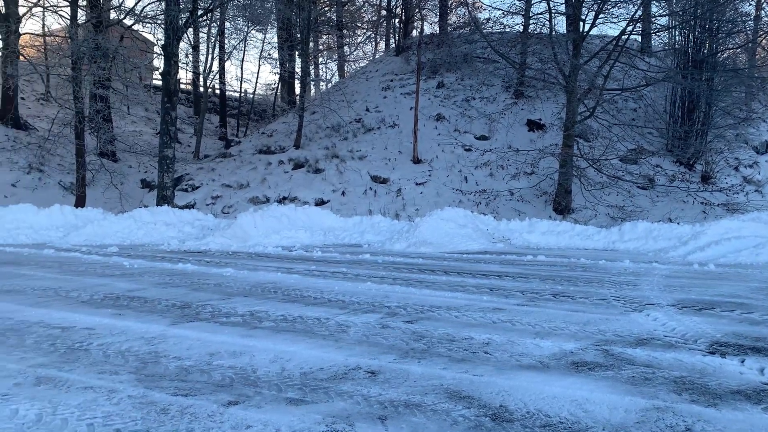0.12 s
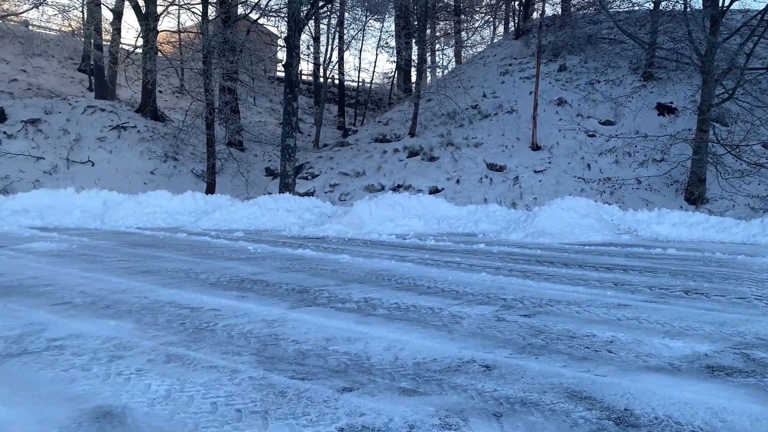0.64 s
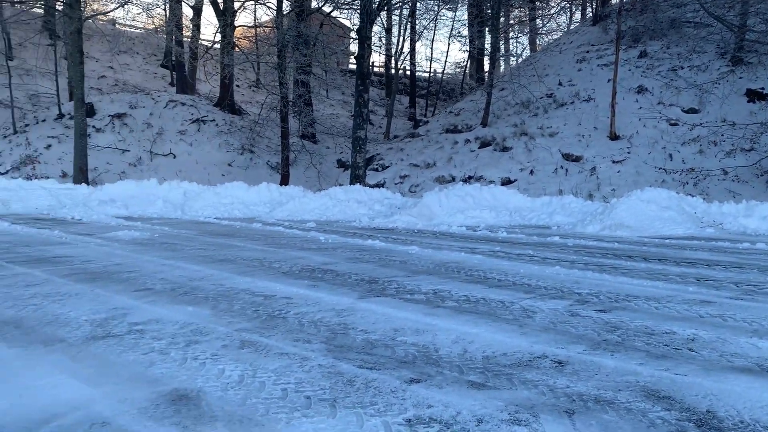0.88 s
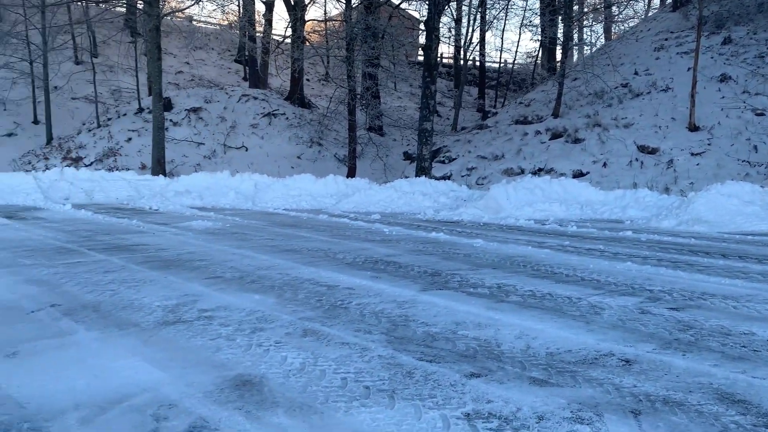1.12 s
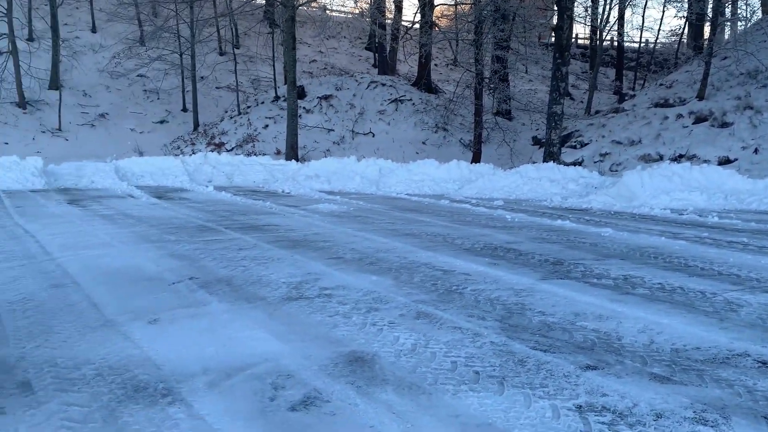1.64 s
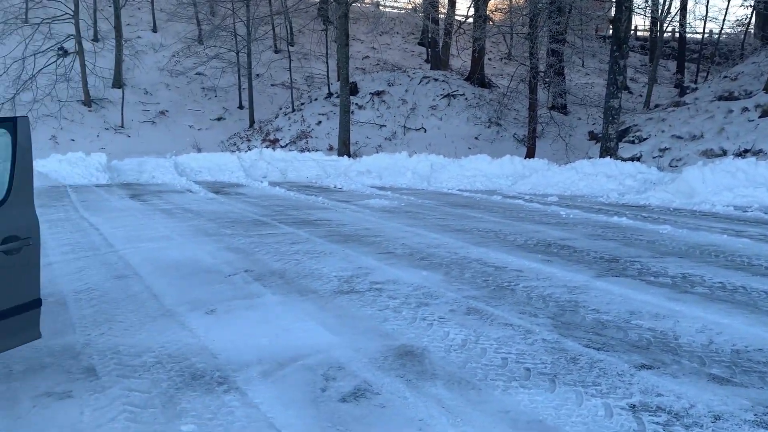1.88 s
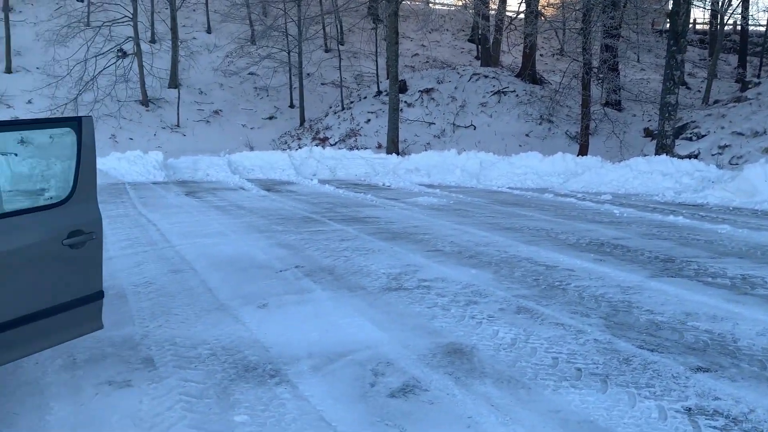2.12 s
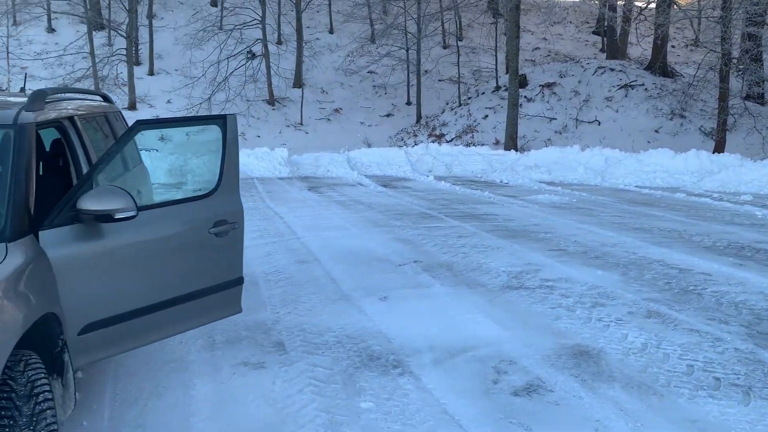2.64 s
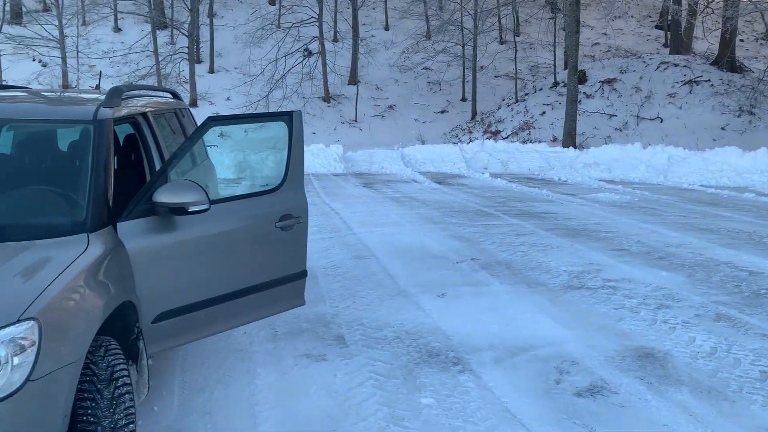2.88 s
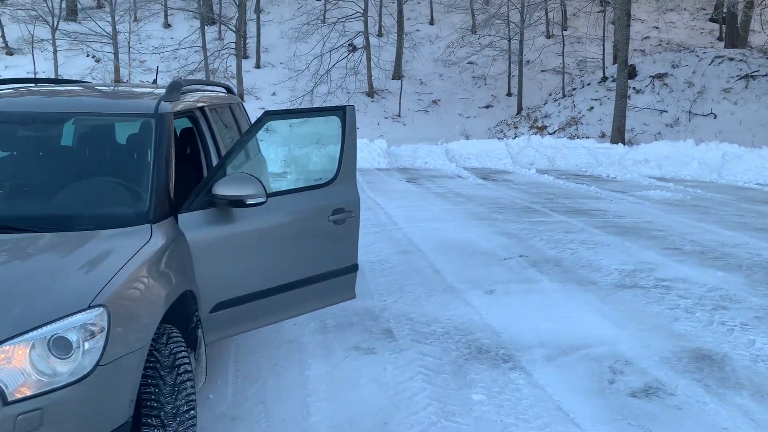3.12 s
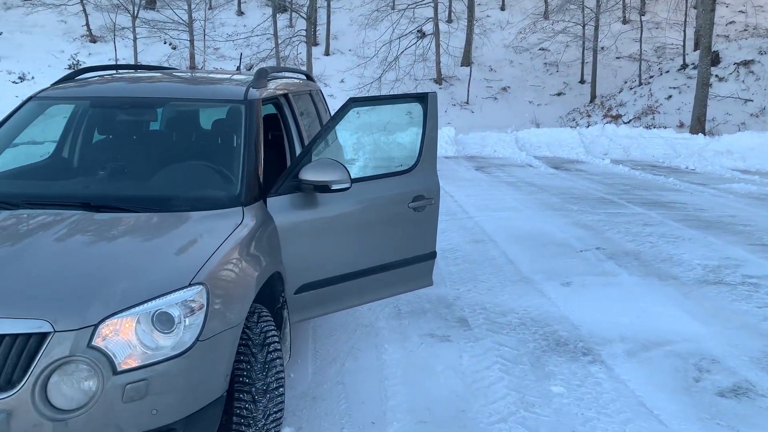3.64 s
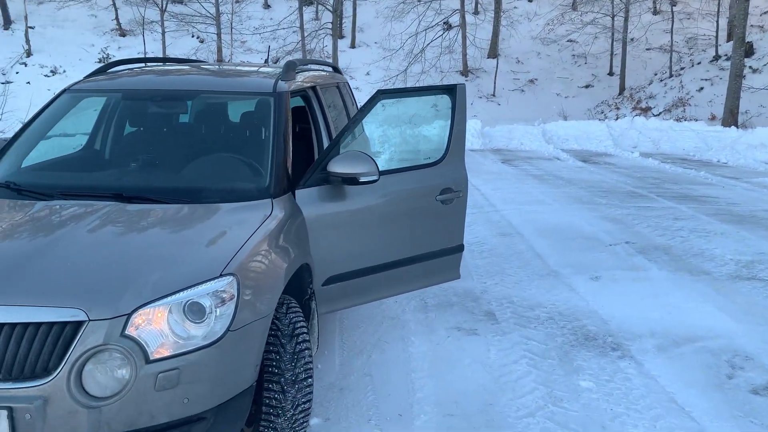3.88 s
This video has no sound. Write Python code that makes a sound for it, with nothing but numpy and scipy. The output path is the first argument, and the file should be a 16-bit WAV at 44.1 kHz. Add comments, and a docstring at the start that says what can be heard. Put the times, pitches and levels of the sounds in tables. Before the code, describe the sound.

Close snow crunching under boots: small crackles, a brief heel crunch, soft sliding, then heavy crusty cracks. Low engine hum and far traffic rumble lie beneath, outdoors, on a mono handheld phone.

```python
"""A cold car park: boots shift and turn on packed snow, close below a handheld phone, in mono.
Crusts crack in short knocks built from brief wave packets and bursts of noise; single crystals tick.
Fine crystals crush and slide under the soles: coloured noise under random grain envelopes.
A car idles nearby, a sum of harmonic orders, over distant traffic of filtered noise."""
import sys
import numpy as np
from scipy import signal
from scipy.fft import rfft, irfft
from scipy.io import wavfile
from scipy.ndimage import uniform_filter1d

SR = 44100
rng = np.random.default_rng(int(sys.argv[2]) if len(sys.argv) > 2 else 0)


def convert_level_to_amplitude(level_db):
    """Map a level in decibels to its linear amplitude factor."""
    exponent = np.asarray(level_db, float) / 20
    return 10 ** exponent


def inscribe(sig):
    """Save sig as 16-bit PCM at rate SR to the path in sys.argv[1].

    A 1-D sig is mono; a 2-D sig holds one channel per row.
    Samples are clipped to [-1, 1] before scaling.
    """
    pcm = np.round(np.clip(np.atleast_2d(sig).T, -1, 1) * 32767)
    wavfile.write(sys.argv[1], SR, pcm.astype(np.int16))


N = 176400  # samples, 4 s


def level(x, db):
    """Normalization: a signal is scaled to an rms level in dB."""
    return x * convert_level_to_amplitude(db) / np.sqrt(np.mean(x ** 2))


def colour(x, table):
    """Spectral shaping: gains in dB, interpolated over log frequency, weight the spectrum; rms 1."""
    hz, db = np.array(table, float).T
    f = np.maximum(np.arange(len(x) // 2 + 1) * SR / len(x), 1)
    gain = convert_level_to_amplitude(np.interp(np.log(f), np.log(hz), db))
    return level(irfft(rfft(x) * gain, len(x)), 0)


def noise():
    """White noise: independent Gaussian samples have a flat mean spectrum."""
    return rng.standard_normal(N)


def narrow(hz, width_hz):
    """Resonance: a bell-shaped gain, halved at half the width from its centre, selects noise; rms 1."""
    f = np.arange(N // 2 + 1) * SR / N
    gain = 1 / (1 + (2 * (f - hz) / width_hz) ** 2)
    return level(irfft(rfft(noise()) * gain, N), 0)


def walk(rate):
    """Slow random modulation: values held for 1 / rate s are smoothed twice; spread near 1."""
    hold = int(SR / rate)
    steps = np.repeat(rng.standard_normal(N // hold + 1), hold)
    return 1.54 * uniform_filter1d(uniform_filter1d(steps, hold), hold)[:N]


def tail(x, seconds):
    """Exponential decay: a one-pole filter lets every impulse die away with this time constant."""
    return signal.lfilter([1], [1, -np.exp(-1 / (abs(seconds) * SR))], x)


def spikes(s, db):
    """Impulsive excitation: one impulse at each time."""
    return np.bincount((s * SR).astype(int), convert_level_to_amplitude(db), N)


def snap(s, db, hz, cycles):
    """Wave packets: a Gaussian envelope limits each oscillation to a few cycles, at random phase."""
    out, k = np.zeros(N), np.arange(-300, 300)
    for start, d, f, turn in zip(s, db, hz, rng.random(len(s))):
        late = cycles / f  # the packet peaks this many seconds after its start
        at = int((start + late) * SR) + k
        inside = at < N
        envelope = np.exp(-.5 * (k / SR / (late / 3.5)) ** 2)
        packet = envelope * np.cos(2 * np.pi * (f * k / SR + turn))
        out[at[inside]] += convert_level_to_amplitude(d) * packet[inside]
    return out


def splinter(impulses, table):
    """Transient radiation: noise rises in about a millisecond and decays after each impulse."""
    rise_s, fall_s = 0.0011, 0.0025
    envelope = 2 * (tail(impulses, fall_s) - tail(impulses, rise_s))
    return envelope * colour(noise(), table)


def grains():
    """Poisson-like shot noise: crystals break at random, few large and many small; rms 1."""
    per_s, spread_db, biggest_db, decay_s = 230, 4, 10, .0016
    chance, size = rng.random((2, N))
    size_db = np.minimum(-spread_db * np.log(1 - size), biggest_db)
    return level(tail((chance < per_s / SR) * convert_level_to_amplitude(size_db), decay_s), 0)


# spectrum of the distant traffic: (frequency [Hz], relative density [dB per Hz])
TRAFFIC_SPECTRUM = [(20, -46), (32, -14), (55, -6.5), (85, -9), (125, -8.5), (190, -16), (320, -16),
                    (450, -19.5), (800, -32), (1300, -35.5), (2000, -53.5), (10000, -59), (15500, -60)]


def distance():
    """Superposition of incoherent sources: traffic rumble and hiss, a low drone and a thin whine."""
    air = colour(noise(), TRAFFIC_SPECTRUM) * convert_level_to_amplitude(-52.5 + walk(2.36))
    drone = convert_level_to_amplitude(-54.5) * narrow(83.6, width_hz=18)
    whine = convert_level_to_amplitude(-100) * narrow(13900, width_hz=150)
    return air + drone + whine


# idling engine: (multiple of the firing rate [1], rms level before swelling [dB])
ENGINE_ORDERS = [(2, -65), (4, -62), (5, -65.5), (9, -67.5), (10, -68.5)]
# gain of orders above the eighth, which swell, drop briefly, then recede: (time [s], gain [dB])
UPPER_ORDER_GAIN = [(.3, 3), (.7, 9), (.8, -9), (1, 4.5), (1.9, -7)]


def engine():
    """Harmonic synthesis: orders of one unsteady firing rate, each swelling and fading."""
    firing_hz, waver_db = 29.49, 3
    phase = 2 * np.pi * np.cumsum(firing_hz * (1 + 0.00897 * walk(1.96))) / SR
    upper_db = np.interp(np.arange(N) / SR, *np.array(UPPER_ORDER_GAIN).T)
    out = np.zeros(N)
    for k, db in ENGINE_ORDERS:
        order_db = db + upper_db * (k > 8) + waver_db * walk(6.5)
        tone = np.cos(k * phase + 2 * np.pi * rng.random())
        out += np.sqrt(2) * convert_level_to_amplitude(order_db) * tone
    return out


# crush under the sole: (time [s], body level [dB], mid treble level [dB], top level [dB])
CRUSH_LEVELS = [(0, -64.5, -69.5, -100), (.06, -57, -62, -95), (.28, -57, -61.5, -87),
                (.4, -69.5, -74.5, -100), (.9, -83, -83, -100), (.96, -54, -53.5, -77),
                (1.05, -52, -59, -68.5), (1.198, -55.5, -62, -82), (1.23, -62.5, -75, -81),
                (1.5, -62, -77, -82), (1.65, -63.5, -65, -72.5), (1.85, -59, -65.5, -73.5),
                (2.06, -66, -62.5, -70), (2.19, -71, -66.5, -77.5), (2.25, -60, -66, -92),
                (2.33, -78, -85.5, -100), (2.818, -72, -80, -100), (2.832, -46.5, -43.5, -71),
                (2.91, -45, -51, -84.5), (3.06, -50, -55.5, -115), (3.1, -60, -58, -93),
                (3.15, -52.5, -54.5, -65), (3.29, -66, -68.5, -100), (3.33, -57, -64, -69),
                (3.44, -50, -66, -91), (3.517, -69, -79, -101), (3.52, -56, -50, -46),
                (3.56, -55.5, -64, -84), (3.59, -70.5, -76.5, -100), (3.84, -70, -74, -113),
                (4, -87, -74, -100)]
# spectra of body, mid treble and top: each (frequency [Hz], relative density [dB per Hz])
BAND_SPECTRA = [
    [(250, -26), (500, -1.5), (1100, 3), (1700, -5), (2600, -58)],
    [(1100, -5.5), (2000, 2.5), (3000, 0), (5300, -11), (6600, -21.5), (8000, -38)],
    [(4200, -12), (5300, 1.5), (6400, -5.5), (7600, -12), (9000, -9.5), (15600, -26.5)],
]
# grain part of the envelope: (share in a light slide [1], share under more weight [1])
GRAIN_PART = (.3, .8)


def crush():
    """Amplitude modulation: a light slide hisses evenly, more weight breaks uneven grains.

    Some grains are heard in all three bands, some in one only; full weight fuses them."""
    t, rows = np.arange(N) / SR, np.array(CRUSH_LEVELS)
    db = [np.interp(t, rows[:, 0], rows[:, k + 1]) for k in range(3)]
    graininess = np.interp(db[0], [-70, -56], GRAIN_PART)  # from body level
    fusing = np.interp(db[1], [-55, -49], [1, .45])  # from mid treble level
    share = graininess * fusing
    common, flicker = grains(), convert_level_to_amplitude(1.5 * walk(70))
    out = np.zeros(N)
    for band_db, spectrum in zip(db, BAND_SPECTRA):
        uneven = np.hypot(common, grains()) / np.sqrt(2)
        grit = (1 - share + share * uneven) * flicker * noise()
        out += convert_level_to_amplitude(band_db) * colour(grit, spectrum)
    return out


# spectrum of the heel's burst: (frequency [Hz], relative density [dB per Hz])
HEEL_SPECTRUM = [(400, -6.5), (900, -7.5), (1600, 3), (2800, -12.5), (6000, -22), (15500, -40.5)]


def heel():
    """Gated noise: a heel breaks the crust in a dense burst that starts and ends suddenly and sags."""
    start_s, length_s = .927, .039
    start_db, sag_db = -37.5, -7
    u = (np.arange(N) / SR - start_s) / length_s  # 0 to 1 through the burst
    gate = uniform_filter1d(((u > 0) & (u < 1)) * 1., size=130)
    burst_db = start_db + sag_db * np.clip(u, 0, 1) + 1.8 * walk(300)
    return gate * convert_level_to_amplitude(burst_db) * colour(noise(), HEEL_SPECTRUM)


# single crystals snapping: (time [s], reference level [dB], pitch [Hz])
TICK_EVENTS = [(0.1237, -39, 3800), (0.167, -44, 4740), (0.217, -54, 2200), (0.26, -46, 4240),
               (0.282, -45, 3050), (0.3173, -47.5, 3000), (0.4855, -38, 2570), (0.611, -47, 2400),
               (0.6489, -40, 2640), (0.6962, -47, 2520), (0.7618, -43.5, 2810), (1.156, -41.5, 2550),
               (1.335, -41.5, 3200), (1.3984, -44.5, 3300), (1.4463, -46, 3100), (1.5429, -46, 3220),
               (1.596, -46, 3460), (1.6269, -43.5, 2830), (1.653, -39, 2940), (1.7293, -40, 2600),
               (2.03, -46, 5200), (3.219, -44, 2530), (3.227, -38.5, 1980), (3.2442, -38.5, 2410),
               (3.5119, -43, 5230), (3.6148, -44, 2370), (3.6939, -44.5, 3140), (3.915, -59, 4940),
               (3.9633, -46.5, 2830)]
# spectrum of a tick's splinter: (frequency [Hz], relative density [dB per Hz])
TICK_SPECTRUM = [(700, 8.5), (2600, 1.5), (6000, -11.5), (15500, -27.5)]


def ticks():
    """Brittle fracture of single crystals: a high wave packet with a splinter of noise."""
    s, db, hz = np.array(TICK_EVENTS).T
    packets = snap(s, db + 0.5, hz, cycles=1.6)
    return packets + splinter(spikes(s, db - 5), TICK_SPECTRUM)


# cracks of the crust: (time [s], knock peak level [dB], knock pitch [Hz], splinter re knock [dB])
CRACK_EVENTS = [(0.06, -38, 1480, -8.5), (0.075, -37, 1240, -13), (0.112, -36.5, 1190, -14),
                (0.137, -33, 1166, -7.5), (0.147, -36.5, 800, -9), (0.232, -35, 920, -13.5),
                (0.239, -33.5, 1240, -20.5), (0.288, -40, 563, -12), (0.409, -44, 1176, -5),
                (0.593, -45, 1170, -2.5), (1.03, -38.5, 1970, 0), (1.048, -42.5, 905, -4),
                (1.108, -40.5, 920, -8.5), (1.13, -39, 880, -24), (1.667, -37, 910, -7),
                (1.742, -43.5, 775, -2), (1.785, -39, 686, -7), (2.008, -43, 940, -17.5),
                (2.929, -32.5, 1140, -8), (2.981, -28, 1410, -8.5), (3.008, -29.5, 960, -12.5),
                (3.042, -24.5, 1260, -11), (3.082, -38.5, 865, -6), (3.107, -37.5, 750, -13),
                (3.122, -24, 2300, -15), (3.134, -23, 960, -16), (3.158, -27, 960, -7.5),
                (3.177, -35, 860, -18), (3.195, -28, 878, -17), (3.32, -30.5, 875, -12.5),
                (3.336, -40, 1090, -24), (3.362, -37.5, 1000, -14), (3.423, -28, 750, -11.5),
                (3.445, -38.5, 664, -10), (3.457, -39.5, 840, -10), (3.521, -25, 920, -17),
                (3.536, -32.5, 657, -8), (3.848, -45, 844, -5), (3.993, -23, 1470, -4.5)]
# spectrum of a crack's splinter: (frequency [Hz], relative density [dB per Hz])
CRACK_SPECTRUM = [(900, -0.5), (1800, 8), (3200, 4), (5600, -6), (7500, -20), (15500, -28)]


def cracks():
    """Brittle fracture of the crust: a knock, a dull thud, a splinter of treble, loose crumbling."""
    s, db, hz, splinter_db = np.array(CRACK_EVENTS).T
    knock = snap(s, db, hz, cycles=2.58)
    thud = snap(s, db - 8.5, np.full(len(s), 358), cycles=0.95)
    treble = splinter(spikes(s, db + splinter_db), CRACK_SPECTRUM)
    # loose grains follow each crack, more slowly than the splinter
    loose = spikes(s, db - 11.5)
    crumbling = (tail(loose, 0.007) - tail(loose, 0.0025)) * convert_level_to_amplitude(6.9 * walk(400))
    return knock + thud + treble + crumbling * colour(noise(), BAND_SPECTRA[0])


def scene():
    """Linear superposition: surroundings, engine and boots add in one channel."""
    return (distance() + engine() + crush() + heel() + ticks() + cracks())[None]


def roll_off(x):
    """The treble ends steeply here."""
    return signal.sosfilt(signal.butter(12, 16430, fs=SR, output="sos"), x)


def record(dry):
    """Signal chain: the finished mix passes through the phone."""
    return roll_off(dry)


dry = scene()
out = record(dry)
inscribe(out)
```